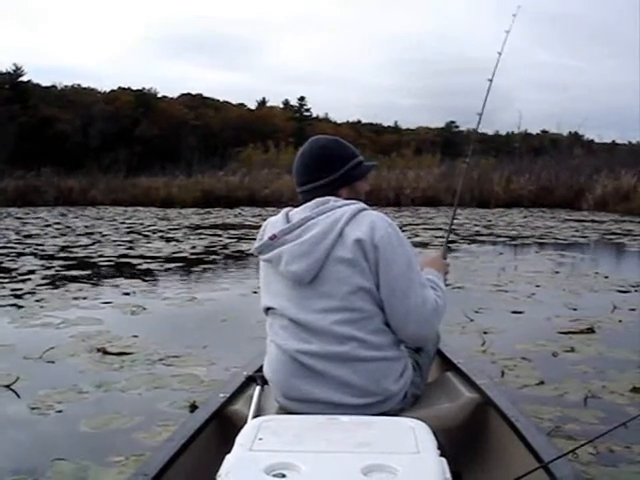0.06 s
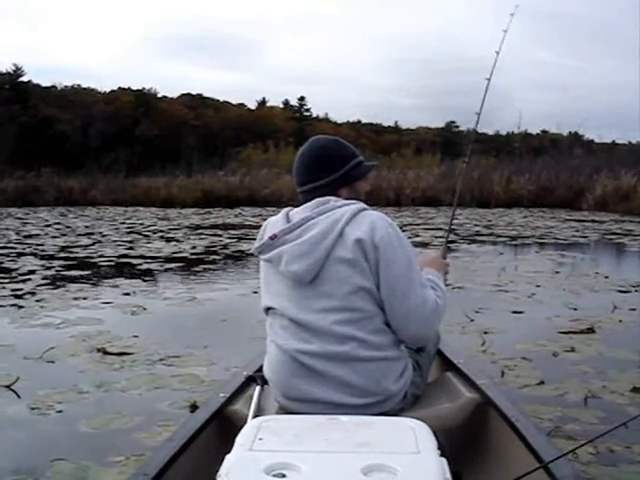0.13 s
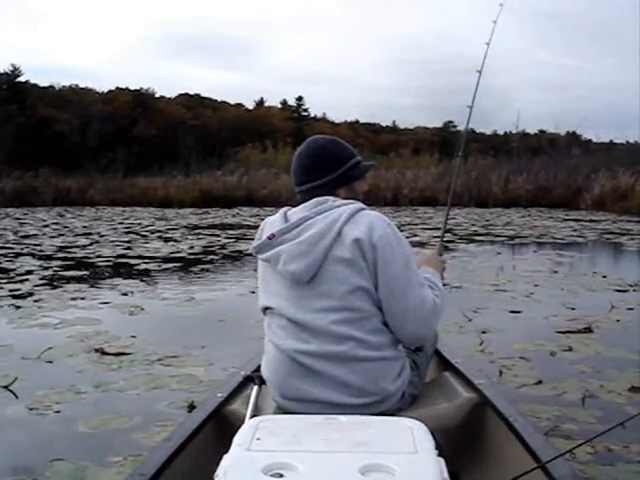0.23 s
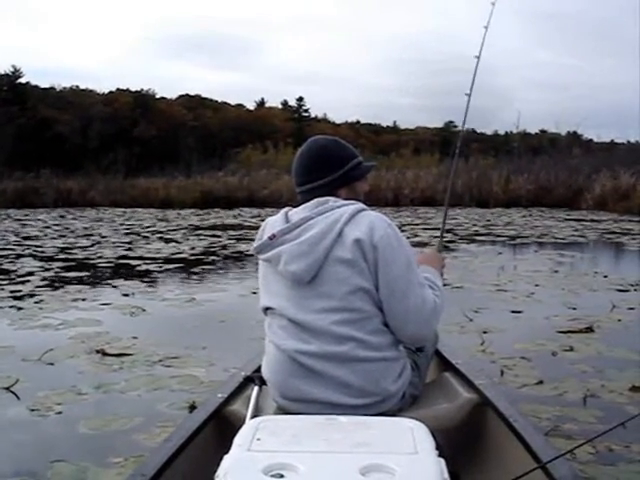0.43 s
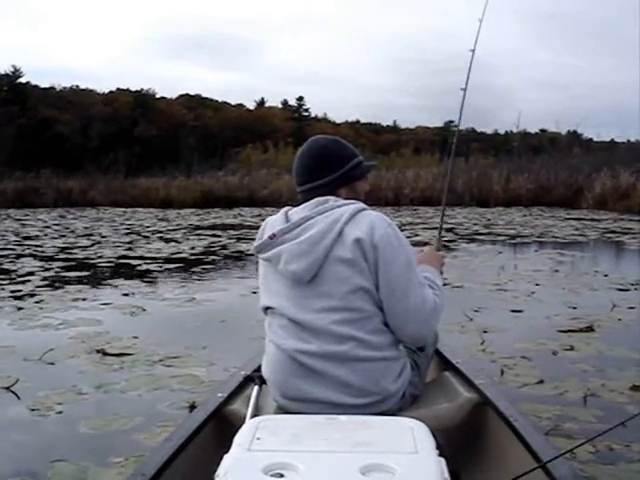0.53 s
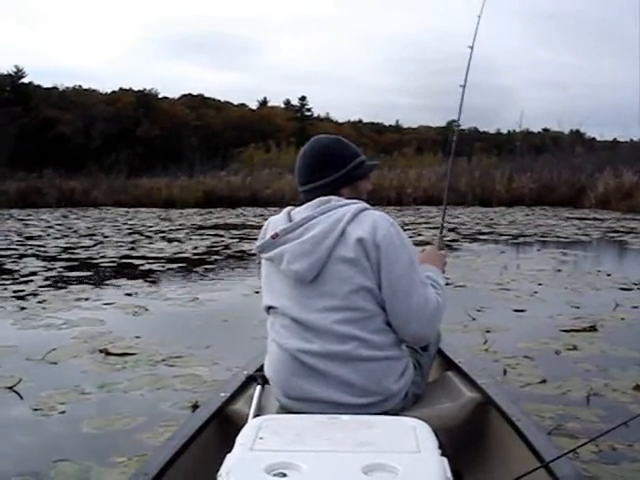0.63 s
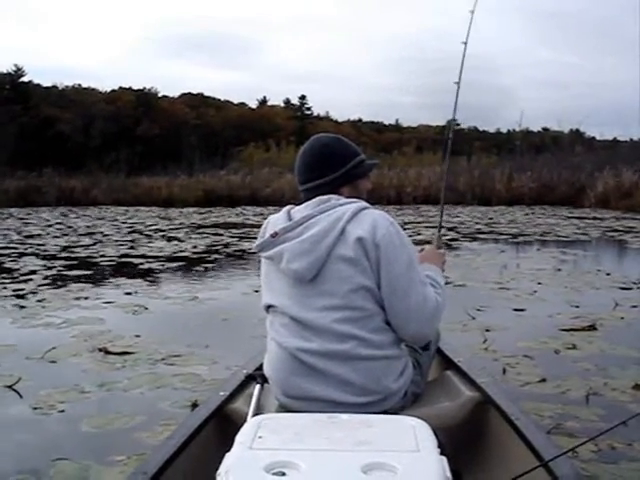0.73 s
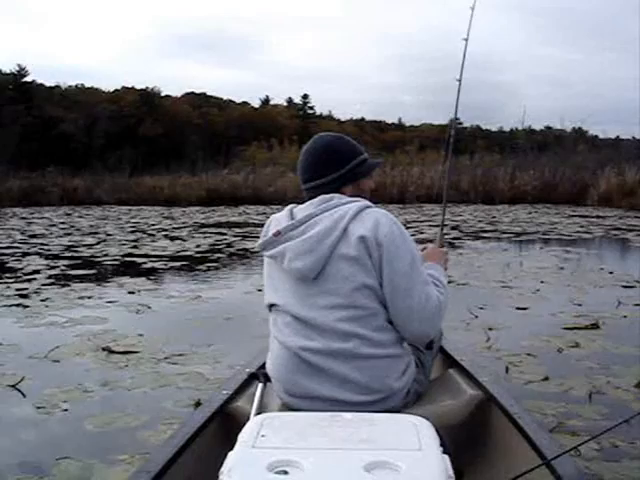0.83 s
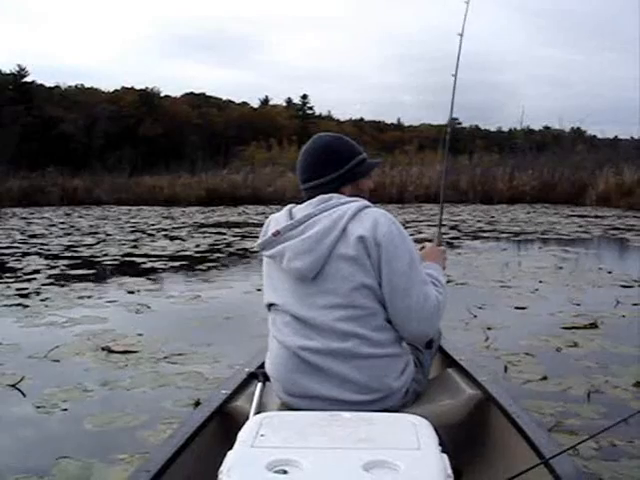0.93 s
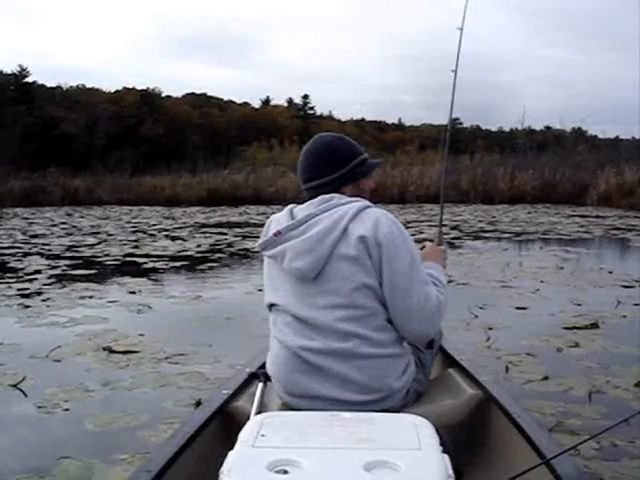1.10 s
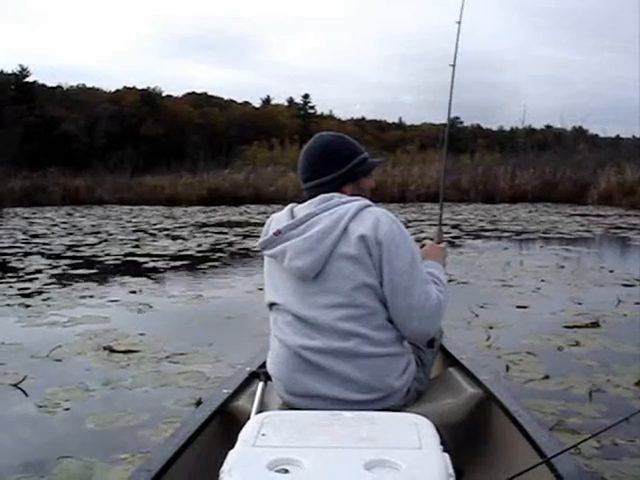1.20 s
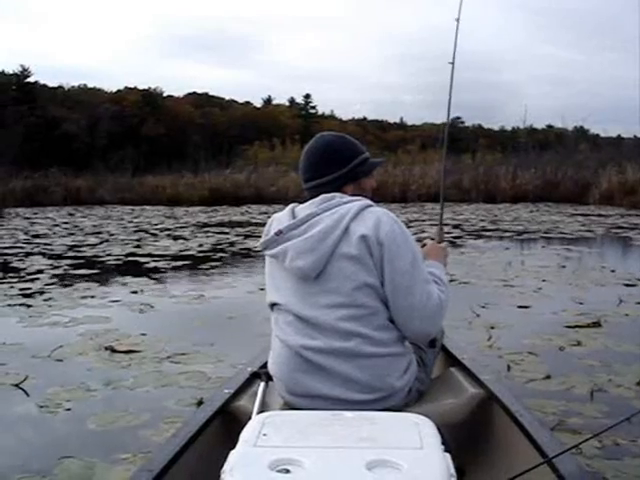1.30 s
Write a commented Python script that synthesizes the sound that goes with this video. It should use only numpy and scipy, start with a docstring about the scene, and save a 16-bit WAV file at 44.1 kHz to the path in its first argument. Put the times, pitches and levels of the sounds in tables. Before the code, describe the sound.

Wind thumps low and dull straight onto a cheap microphone outdoors on a pond, bursting hardest and crackling early on, then easing; a single small fishing reel click follows, with weaker gusts over steady hiss.

```python
"""Wind on a microphone in a canoe on a pond, with one click of a fishing reel.
Far air and preamp hiss (shaped noise) and a thin electronic whine (sine in narrow noise) run throughout.
Gusts buffet the capsule in low, ringless thumps (short pressure wobbles), hardest in one burst near 0.3 s.
A faint passing moan (narrow noise) swells around 0.96 s, and at 0.99 s the reel clicks (decaying modes).
Weaker gusts return from about 1.1 s."""
import sys
import numpy as np
from scipy import signal
from scipy.io import wavfile
from scipy.ndimage import uniform_filter1d

SR = 44100
rng = np.random.default_rng(int(sys.argv[2]) if len(sys.argv) > 2 else 0)


def bounce(signal):
    """Save signal as a 16-bit WAV file at the path given by the first command-line argument."""
    frames = np.transpose(np.atleast_2d(signal))
    limited = np.clip(frames, -1, 1)
    pcm = np.round(limited * 32767).astype(np.int16)
    wavfile.write(sys.argv[1], SR, pcm)


N = 59535
TIME_S = np.arange(N) / SR


def gain_of(db):
    """Decibel law: 20 dB is a factor of ten in amplitude."""
    return 10 ** (np.asarray(db) / 20)


def evened(x):
    """RMS normalisation: the mean square becomes one."""
    return x / np.sqrt(np.mean(x ** 2) + 1e-20)


def add(mix, start_s, sound):
    """Superposition: adds a sound into the mix from start_s, cutting what falls outside."""
    at = round(start_s * SR)
    part = mix[max(at, 0):][:len(sound) + min(at, 0)]
    part += sound[max(-at, 0):][:len(part)]


def filtered(x, order, hz, kind="low"):
    """Linear filtering: a Butterworth response with its corner at hz."""
    return signal.lfilter(*signal.butter(order, hz, kind, fs=SR), x)


# Far air and hiss spectrum. Each row: frequency in Hz, relative spectral level in dB.
AIR_SPECTRUM = [(88, -48), (150, 1.5), (461, -3), (549, -5.5), (793, -3.5), (881, -5.5), (1050, -4),
                (1190, -6.5), (2390, -13), (2570, -13), (9900, -23), (12900, -53), (21800, -120)]
AIR_DB, AIR_PATCH_DB = -47.5, 1.27  # overall RMS level; RMS patchiness
AIR_STEP_HZ, AIR_TOP_DB = 10000, -33.5  # from this step up, one flat relative level replaces the table


def air():
    """Spectral shaping: random Fourier frames, weighted in level, give steady, slightly patchy noise."""
    frames, hz = N // 256 + 5, np.fft.rfftfreq(1024, 1 / SR)
    real, imaginary, patches = rng.standard_normal((frames, 513, 3)).T
    # smooth the patches over frequency, then over time
    patches = uniform_filter1d(patches, 14, 0)
    patches = evened(uniform_filter1d(patches, 12, 1))
    table_hz, table_db = np.transpose(AIR_SPECTRUM)
    level_db = np.interp(np.log(hz + 1), np.log(table_hz), table_db)
    level_db = np.where(hz < AIR_STEP_HZ, level_db, AIR_TOP_DB)
    spectrum = (real + 1j * imaginary) * gain_of(level_db[:, None] + AIR_PATCH_DB * patches)
    noise = signal.istft(spectrum, nperseg=1024, noverlap=768)[1][:N]
    return gain_of(AIR_DB) * evened(noise)


def fuzz(hz, width_hz):
    """Heterodyning: slow complex noise from a one-pole filter is shifted up to a narrow band at hz."""
    pole = np.exp(-np.pi * width_hz / SR)
    noise = rng.standard_normal(N) + 1j * rng.standard_normal(N)
    slow = signal.lfilter([1], [1, -pole], noise)
    return evened((slow * np.exp(2j * np.pi * hz * TIME_S)).real)


WHINE_HZ, WHINE_DB = 7870, -69  # RMS level
WHINE_SKIRT_HZ, WHINE_SKIRT_DB = 250, -62  # bandwidth, RMS level


def whine():
    """Pure tone: a steady sinusoid stands in a narrow skirt of noise."""
    tone = evened(np.cos(2 * np.pi * WHINE_HZ * TIME_S))
    return gain_of(WHINE_DB) * tone + gain_of(WHINE_SKIRT_DB) * fuzz(WHINE_HZ, WHINE_SKIRT_HZ)


GLIDE = 0.395  # largest pitch slide either side of the centre, as a fraction


def puff(centre_s, db, hz, width_s, phase, bend=.5):
    """Aperiodic pulse: a pressure wobble of sliding pitch under a pointed bell, with no resonance to ring on."""
    t = np.arange(-4 * width_s, 4 * width_s, 1 / SR)
    slide = GLIDE * (2 * bend - 1) * width_s * np.log(np.cosh(t / width_s))
    turns = hz * (t + slide)
    bell = np.hanning(len(t)) / (1 + 2.07 * (t / width_s) ** 2) ** 2
    return centre_s - 4 * width_s, gain_of(db) * bell * np.cos(2 * np.pi * (turns + phase))


EDDY_SPREAD_DB = 2.5  # spread of force among the small eddies


def crowd(per_s, low_hz, high_hz, cycles, count=12):
    """Shot noise: random impulse trains convolved with puffs of many sizes, at an even overall level."""
    out = np.zeros(N + 4000)
    for hz, chance in zip(np.geomspace(low_hz, high_hz, count), rng.random((count, 2))):
        when, force = rng.random((N + 4000, 2)).T
        strikes = when < per_s / count / SR
        train = strikes * gain_of(-EDDY_SPREAD_DB * np.log(force + 1e-3))
        _, eddy = puff(0, 0, hz, cycles / hz, *chance)
        out += signal.oaconvolve(train, eddy, "same")
    return evened(out[2000:-2000])


# Gust strength. Each row: time in seconds, then relative levels in dB of the eddies, slow sway and fine eddies.
GUST_STRENGTH = [(0.0, -44, -47, -48), (0.188, -37.5, -38, -52), (0.206, -31, -28, -45),
                 (0.224, -51, -44, -77), (0.236, -5, -33, -11), (0.244, -5, -38, -12.5),
                 (0.258, -17.5, -22, -49), (0.284, -1.5, -27, -6), (0.296, -16, -41, -20.5),
                 (0.322, -0.5, -33, -15.5), (0.334, -20, -55, -28), (0.348, -5.5, -19.5, -22.5),
                 (0.386, -27.5, -30.5, -50), (0.496, -48, -42, -63), (0.566, -28, -40, -51),
                 (0.582, -39, -33, -63), (0.604, -24.5, -34, -42), (0.62, -47, -44, -44),
                 (0.66, -45, -45, -59), (0.728, -29.5, -34, -63), (0.748, -41.5, -44.5, -51.5),
                 (0.928, -50, -52, -53.5), (1.116, -31, -36.5, -51.5), (1.244, -43, -39, -55),
                 (1.318, -32, -39.5, -59), (1.35, -33, -47, -56)]
EDDY_DB, FINE_DB, SWAY_DB = -9, -6, -0.5  # added to the gust levels
EDDY_CYCLES, FINE_CYCLES, SWAY_CYCLES = 0.42, 0.84, 0.79  # bell width in cycles


def gust_eddies():
    """Amplitude modulation: the gust strength scales crowds of small eddies and a slow sway."""
    when, *levels = np.transpose(GUST_STRENGTH)
    gust, sway, fine = (gain_of(np.interp(TIME_S, when, db)) for db in levels)
    out = gain_of(EDDY_DB) * gust * crowd(300, 99, 358, EDDY_CYCLES)
    out += gain_of(FINE_DB) * fine * crowd(700, 480, 950, FINE_CYCLES)
    out += gain_of(SWAY_DB) * sway * crowd(110, 61, 109, SWAY_CYCLES)
    return out


# Strong eddies bursting on the microphone.
# Each row: centre in seconds, level of the bell's peak in dB, centre pitch in Hz, bell width in ms.
STRONG_EDDIES = [(0.0692, -29, 115, 8.8), (0.0811, -33, 200, 3.0), (0.1048, -21.5, 209, 3),
                 (0.128, -21, 148, 5.3), (0.1381, -25.5, 179, 1.4), (0.143, -18, 205, 2.37),
                 (0.1472, -28.5, 215, 1.4), (0.187, -23, 200, 3.8), (0.1927, -19, 178, 3.3),
                 (0.202, -30, 152, 5.9), (0.2089, -17.5, 232, 2), (0.2295, -24.5, 228, 7.1),
                 (0.2376, -9.5, 254, 3.7), (0.247, -3, 308, 1.56), (0.2544, -13.5, 227, 6.7),
                 (0.2664, -9.5, 196, 5.6), (0.2763, -10.5, 262, 3.8), (0.2872, -3.5, 355, 7.7),
                 (0.2922, -8, 216, 10.7), (0.2975, -2, 252, 1.83), (0.3112, -6, 330, 4.1),
                 (0.3164, 0.5, 372, 1.25), (0.3218, -8, 400, 2.1), (0.3276, 1.5, 315, 2.5),
                 (0.3366, -3.5, 238, 2.7), (0.34, -16, 180, 1.7), (0.3466, -9, 390, 6.5),
                 (0.353, -13, 302, 2.6), (0.3642, -14, 190, 8.5), (0.3722, -18, 260, 3.3),
                 (0.403, -16.5, 235, 3.1), (0.4127, -22, 265, 4.6), (0.4188, -25, 199, 4.7),
                 (0.5352, -20.5, 136, 6.4), (0.5598, -14.5, 175, 6.1), (0.5686, -15, 250, 2.4),
                 (0.598, -22, 304, 1.7), (0.6034, -11.5, 345, 3.7), (0.622, -35.5, 120, 8),
                 (0.7114, -19.5, 220, 2.2), (0.7162, -22, 170, 3.9), (0.7225, -22.5, 272, 3.7),
                 (0.7273, -19, 170, 4.6), (0.778, -30.5, 112, 2.7), (1.029, -35, 197, 5.5),
                 (1.0772, -27, 182, 7.6), (1.0868, -25.5, 171, 4.1), (1.093, -28, 170, 7.2),
                 (1.1056, -22.5, 155, 6), (1.1145, -21, 204, 2), (1.126, -24.5, 180, 7.7),
                 (1.1359, -22.5, 146, 3.5), (1.1827, -22, 208, 3), (1.265, -34, 148, 7.3),
                 (1.299, -29, 167, 2.1), (1.3075, -30, 169, 13.6), (1.32, -23.5, 219, 3.7),
                 (1.332, -31, 150, 14), (1.3374, -23, 215, 3.2)]


def thumps():
    """Turbulent pressure: each strong eddy is one brief low wobble."""
    out = np.zeros(N)
    for (s, db, hz, ms), chance in zip(STRONG_EDDIES, rng.random((len(STRONG_EDDIES), 2))):
        add(out, *puff(s, db, hz, ms / 1000, *chance))
    return out


# Sharp edges where the hardest eddies slap the capsule.
# Each row: centre in seconds, level of the bell's peak in dB, centre pitch in Hz,
# bell width in cycles, starting level of the crack noise in dB before its low-pass.
CAPSULE_SLAPS = [(.1435, -30, 546, 0.98, -60), (0.207, -29.5, 587, 1.6, -60), (.2395, -6.5, 730, 1.56, -60),
                 (.2412, -8.5, 820, 0.37, -24), (0.2826, -14, 606, 0.48, -33),
                 (0.2856, -10, 830, 0.97, -60), (0.3161, -5.5, 960, 0.54, -25), (.324, -13, 653, 0.77, -62),
                 (0.346, -6, 633, 1.8, -51), (.366, -24, 543, 2.6, -60), (.561, -29, 480, 2.2, -60),
                 (.603, -24, 565, 1.44, -40), (.7225, -28.5, 500, 1.8, -62)]
CRACK_MS, CRACK_HZ = 0.26, 9200  # decay time constant, low-pass corner


def slaps():
    """Impact transient: a short wobble, with a crack of decaying low-passed noise from its centre."""
    out, cracks = np.zeros(N), np.zeros(N)
    decay = np.exp(-np.arange(100) / SR * 1000 / CRACK_MS)
    for (s, db, hz, cycles, crack_db), chance in zip(CAPSULE_SLAPS, rng.random((len(CAPSULE_SLAPS), 2))):
        add(out, *puff(s, db, hz, cycles / hz, *chance))
        add(cracks, s, gain_of(crack_db) * decay * rng.standard_normal(100))
    return out, filtered(cracks, 4, CRACK_HZ)


RASP_DB, RASP_HZ = -31.5, 2980  # gain on the local pressure magnitude, high-pass corner
MIC_LOW_HZ = 45.6


def buffeting():
    """Wind noise: eddies and slaps add up, a bright rasp follows their magnitude, and the microphone cuts the lows."""
    pressure = thumps()
    edges, cracks = slaps()
    pressure += edges + gust_eddies()
    rasp = filtered(rng.standard_normal(N), 1, RASP_HZ, "high")
    rasp *= gain_of(RASP_DB) * uniform_filter1d(abs(pressure), size=200)
    return filtered(pressure + filtered(rasp, 1, CRACK_HZ) + cracks, 2, MIC_LOW_HZ, "high")


MOAN_S, MOAN_LENGTH_S = 0.96, 0.14  # centre and width of the swell
MOAN_HZ, MOAN_WIDTH_HZ, MOAN_DB = 1193, 66, -53  # RMS level at the height of the swell


def moan():
    """Narrow-band noise: a faint fuzzy tone swells and fades once under a Gaussian envelope."""
    swell = np.exp(-((TIME_S - MOAN_S) / MOAN_LENGTH_S) ** 2)
    return gain_of(MOAN_DB) * swell * fuzz(MOAN_HZ, MOAN_WIDTH_HZ)


# Contacts within the click. Each row: start in seconds, peak level in dB.
REEL_CONTACTS = [(.992, -34), (.994, -11), (.9952, -22), (.9976, -26)]
# Ringing modes of the reel. Each row: frequency in Hz, relative level in dB, 60 dB decay time in seconds.
REEL_MODES = [(1220, -21, 0.048), (2244, 0.5, 0.0092), (3408, 1, 0.0094), (3775, -2.5, 0.01),
              (4500, -11, 0.0089), (5264, -13, 0.0097), (5730, -5, 0.0041), (6770, -21, 0.013),
              (7240, -23, 0.012), (8660, -19, .01), (9820, -27, 0.019), (10900, -26, 0.0075),
              (12000, -23.5, 0.0072), (13900, -24, 0.0087), (15200, -13, .01)]
CLICK_RISE_MS = .9  # time constant


def reel():
    """Modal synthesis: a few quick contacts ring the small parts of the reel as decaying sinusoids."""
    out, t = np.zeros(N), np.arange(1500) / SR
    ring = np.zeros(len(t))
    for k, (hz, db, t60) in enumerate(REEL_MODES):
        sign = (-1) ** k  # neighbouring modes start in opposite directions
        ring += sign * gain_of(db - 60 * t / t60) * np.sin(2 * np.pi * hz * t)
    ring *= 1 - np.exp(-t * 1000 / CLICK_RISE_MS)
    for s, db in REEL_CONTACTS:
        add(out, s, gain_of(db) * ring / abs(ring).max())
    return out


def scene():
    """Superposition: all the sources add as one channel."""
    return (buffeting() + air() + whine() + moan() + reel())[None]


CEILING = 0.86  # amplitude that the rounded peaks approach
MIRROR_HZ, MIRROR_DB = 12100, -7.5  # mirror centre, gain on the bass slope per sample
EDGE_HZ = 15600  # upper band limit


def record(dry):
    """Saturation and imaging: peaks round off, a crude rate change mirrors the bass, and the band is limited."""
    dry = dry / (1 + (dry / CEILING) ** 4) ** .25
    bass = filtered(dry, 2, 1800)
    # the slope of the bass, shifted to both sides of the mirror centre
    mirror = gain_of(MIRROR_DB) * np.gradient(bass, axis=1) * np.cos(2 * np.pi * MIRROR_HZ * TIME_S)
    band_limit = signal.firwin(511, EDGE_HZ, window=("kaiser", 9), fs=SR)[None]
    return signal.oaconvolve(dry + mirror, band_limit, "same")


dry = scene()
out = record(dry)
bounce(out)
```